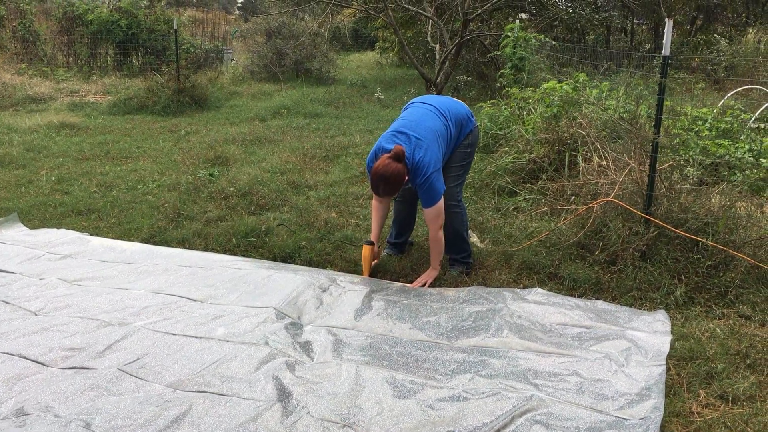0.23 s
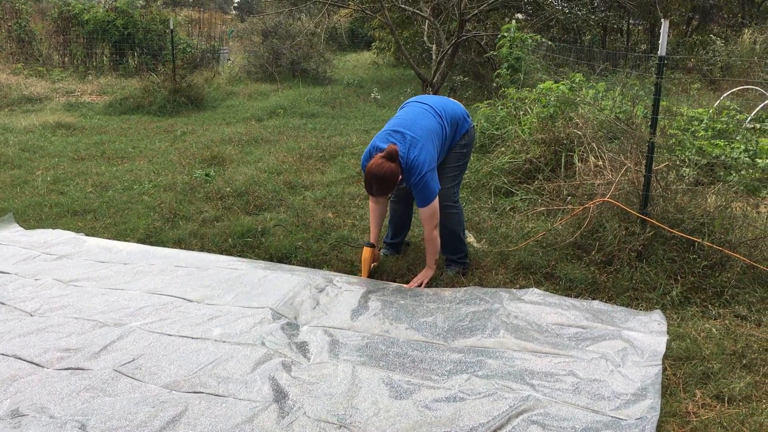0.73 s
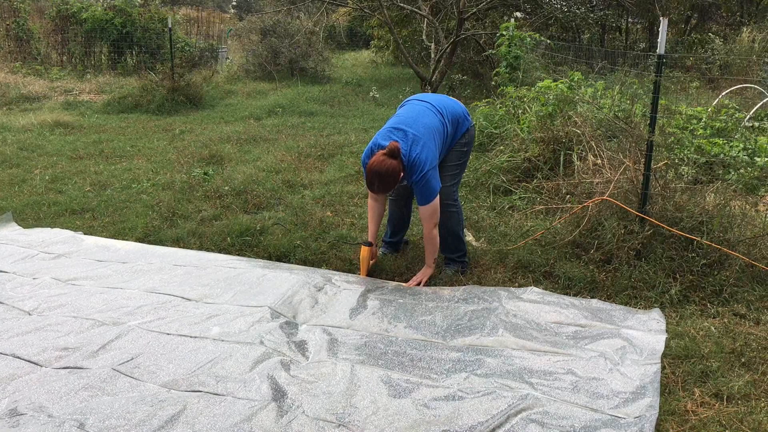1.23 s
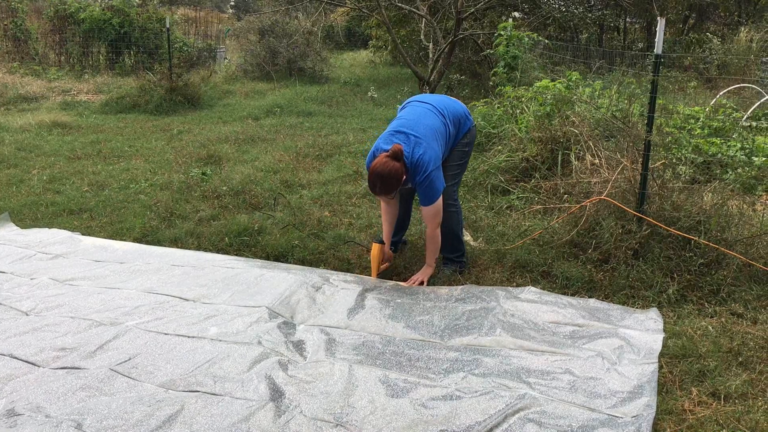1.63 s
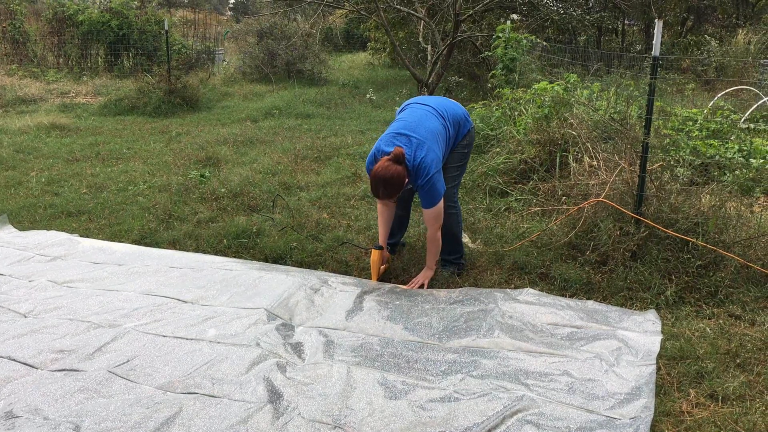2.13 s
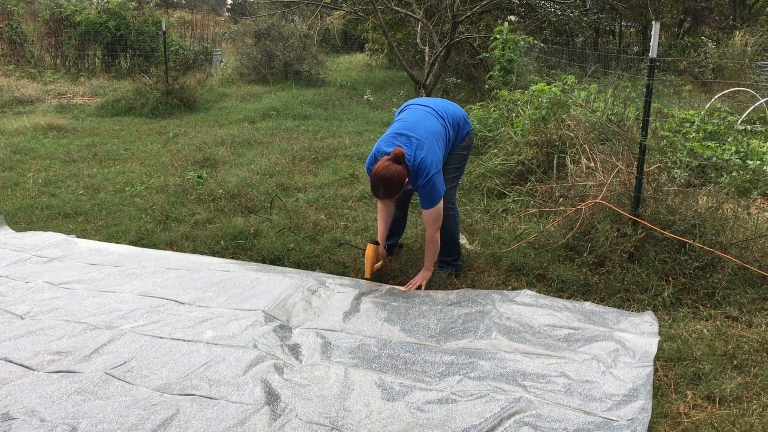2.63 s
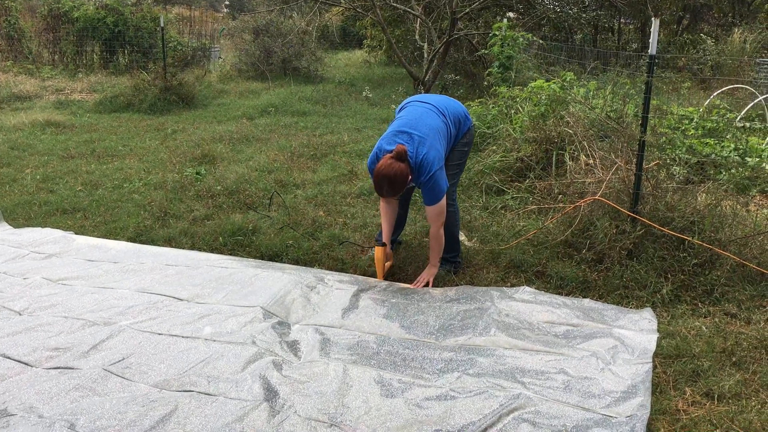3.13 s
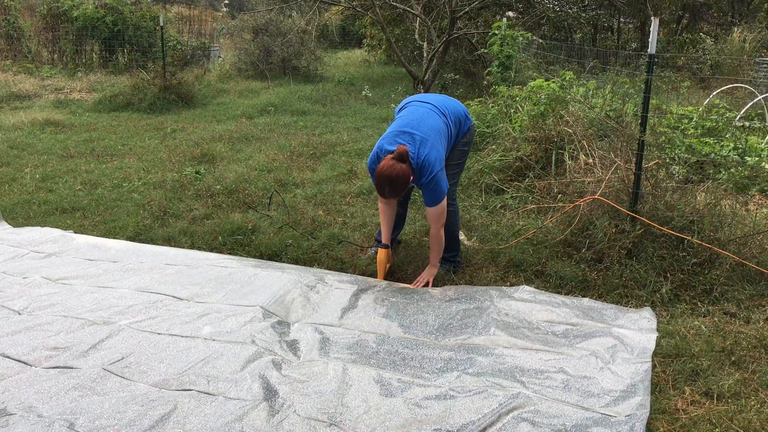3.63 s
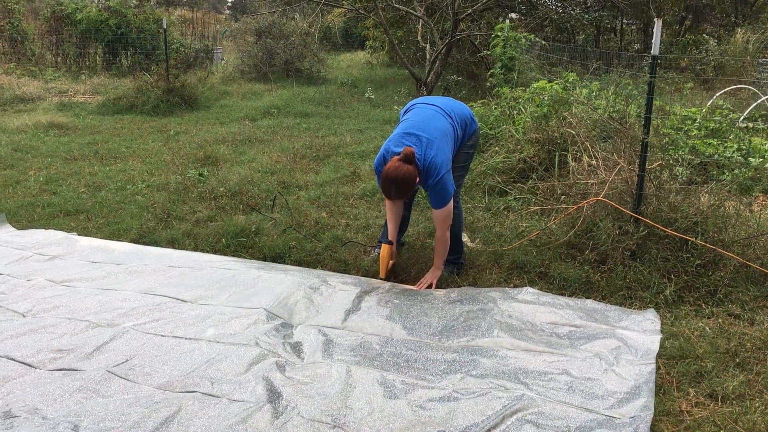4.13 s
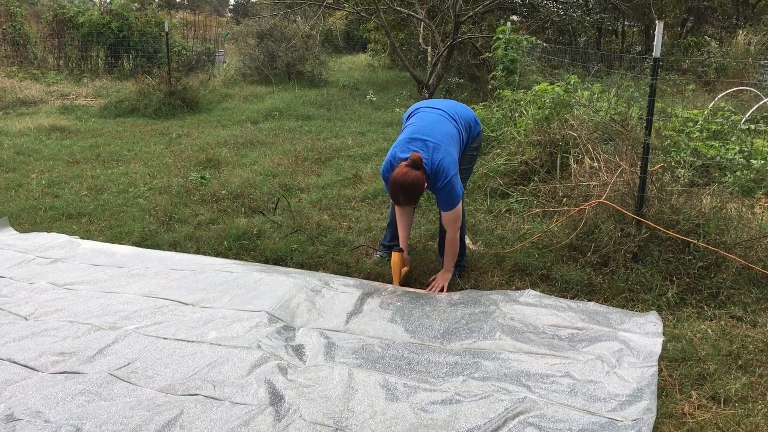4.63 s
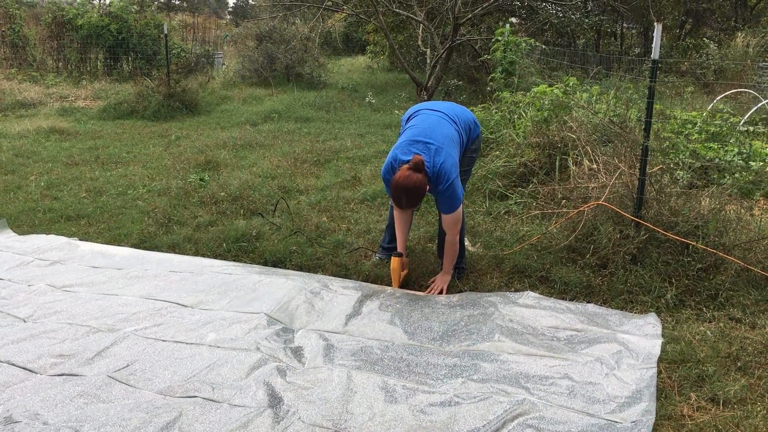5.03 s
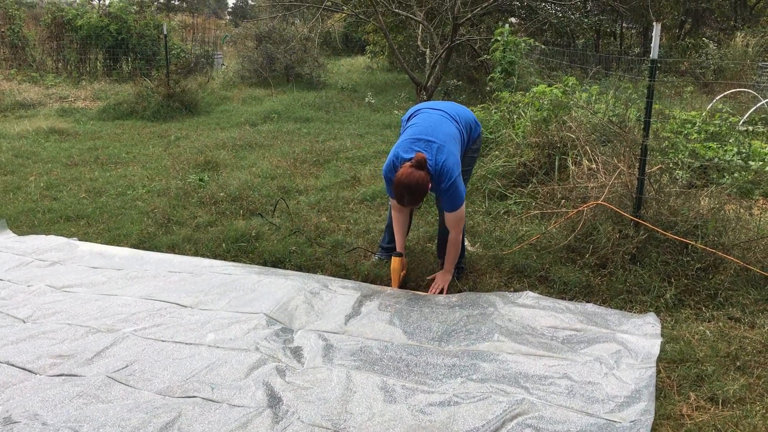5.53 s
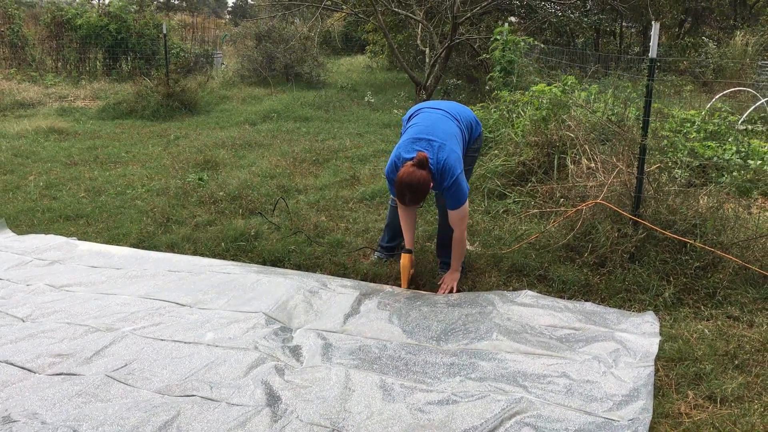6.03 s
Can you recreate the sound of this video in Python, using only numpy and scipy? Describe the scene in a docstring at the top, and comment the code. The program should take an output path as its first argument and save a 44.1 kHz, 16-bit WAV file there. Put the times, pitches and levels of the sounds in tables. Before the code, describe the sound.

Four sharp, spaced shots from an electric staple gun outdoors, with soft plastic ticks and a light breeze in the foliage.

```python
"""A lawn, one microphone a few metres from an electric staple gun tacking plastic sheet to a board.
In each of four shots the plunger slides, slams the staple into the wood and springs back on its stop.
There are no walls: grass and bushes return only a faint tail. Creases in the sheet tick under a hand,
foliage hisses all round, a far bird chirps and a light wind rumbles on the microphone."""
import sys
import numpy as np
from scipy import signal
from scipy.fft import rfft, irfft
from scipy.io import wavfile

SR = 44100
rng = np.random.default_rng(int(sys.argv[2]) if len(sys.argv) > 2 else 0)


def put_to_file(sound):
    """Save the sound as 16-bit audio at rate SR, in the file named by the first command-line argument."""
    columns = np.atleast_2d(sound).T  # one column per channel
    safe = np.clip(columns, -1, 1)
    whole_steps = np.round(safe * 32767)
    wavfile.write(sys.argv[1], SR, whole_steps.astype(np.int16))


N = 276948
AGE = np.arange(SR // 3) / SR   # seconds since a short sound began

# Far leaves in the breeze. Each row: frequency in Hz, relative level in dB.
LEAF_SPECTRUM = [(120, 3), (200, -3.5), (283, -3), (472, -5.5), (621, 0.5), (929, 2), (2450, -0.5),
                 (2940, -6.5), (3460, -2.5), (4900, -10), (5570, -9), (9130, -17), (10400, -16.5),
                 (15000, -23), (15800, -28)]
# Wind on the microphone. Each row: frequency in Hz, relative level in dB.
WIND_SPECTRUM = [(12, -40), (20, -21), (43, 0), (64, 2.5), (260, -24.5), (340, -76), (570, -120)]
# Its slow swell, about one gust a second. Each row: time in seconds, relative level in dB.
WIND_GUSTS = [(0, -51), (0.4, -46), (1.0, -48.0), (1.5, -53.5), (2.3, -46), (2.95, -52.0), (3.25, -45.5),
              (4.15, -49.0), (4.95, -46.5), (5.75, -51.5), (6.2, -47.5)]
# Soft bumps of air on the microphone. Each row: start in seconds, pitch in Hz, level in dB.
AIR_BUMPS = [(3.211, 61, -28), (4.36, 70, -35), (6.22, 58, -31)]
# A small far bird. Each row: start and length in seconds, first and last pitch in Hz, level in dB.
BIRD_CHIRPS = [(1.956, .022, 6350, 6960, -48), (3.344, 0.0067, 5840, 6360, -42),
               (5.292, .026, 6300, 7500, -49)]
# Ticks of the sheet under the hand. Each row: start in seconds, relative level in dB.
SHEET_TICKS = [(0.3845, -34), (1.3764, -28), (3.0142, -30.5), (3.705, -28), (4.2702, -27.5), (5.6356, -27),
               (5.9556, -26.5), (6.1996, -32), (6.2378, -28)]
# Crinkling plastic and dry grass. Each row: frequency in Hz, relative level in dB.
CRINKLE_SPECTRUM = [(300, -3.5), (1200, 3), (3000, 2.5), (6000, -6.5), (10000, -10.5), (15000, -23)]
# What grass and bushes return of a shot. Each row: frequency in Hz, relative level in dB.
SCATTER_SPECTRUM = [(200, -26), (1000, -5), (3500, 3), (8000, 1), (15000, -11)]
# The plunger's steel, sliding and snapping. Each row: frequency in Hz, relative level in dB.
PLUNGER_SPECTRUM = [(200, -3.5), (700, -6.5), (2000, 4.5), (5000, 0.5), (8500, 0), (15000, -9)]
# The dense ringing of housing and nose. Each row: frequency in Hz, relative level in dB.
CRACK_SPECTRUM = [(120, -17), (250, -1.5), (480, -20.5), (800, 2.5), (1400, -0.5), (2600, 2.5), (4200, 3),
                  (5300, 0), (8500, -4), (10300, -5.5), (12000, -9), (15500, -18)]
# How fast that ringing dies. Each row: frequency in Hz, time to fall 60 dB in seconds.
CRACK_DECAY = [(150, 0.098), (1000, 0.049), (3000, 0.026), (6000, 0.017), (14000, 0.032)]
# Modes of the gun pressed on the board.
# Each row: frequency in Hz, relative level in dB, time to fall 60 dB in seconds.
GUN_ON_BOARD_MODES = [(190.7, -30.5, 0.063), (347, -32.5, 0.045), (522, -31, 0.062), (759.5, -18.5, 0.045),
                      (874, -18, 0.048), (987, -22, 0.082), (1128, -21, 0.063), (1283, -22.5, 0.058),
                      (1500, -21.5, 0.04), (1610, -24, 0.073), (2230, -43, .035), (2550, -23, 0.017),
                      (3160, -26.5, 0.038), (3965, -13.5, 0.023), (4235, -14.5, 0.022), (5050, -34, .03),
                      (6270, -18.5, 0.021), (7560, -18.5, 0.015), (8350, -18.5, 0.019),
                      (11780, -24.5, 0.022)]
# The shots. Each row: strike time in seconds, gain in dB, delay in seconds and gain in dB of the
# staple seating, the same two for the plunger's return, board resonance in Hz, its gain in dB,
# then the gains of thud, low mids, upper mids and treble in dB.
STAPLE_SHOTS = [(1.0771, 0, 0.0036, -2.5, 0.014, -15.5, 867, -1.5, 4, 6, 0, 3.5),
                (2.3771, 0, .0031, -2.5, 0.019, -16.5, 1340, 6.5, 1, 0.5, 4, 0),
                (3.9102, 1, .0032, 0.5, .0178, -13, 2030, 5.5, -1, -1, 1.5, -1),
                (5.3272, -1.5, .0030, 1.5, 0.017, -13, 1520, 8, -3, -2.5, 1, 2.5)]


def from_db(db):
    """Decibels to gain."""
    return 10 ** (np.asarray(db) / 20)


def rms_one(x):
    """Scale to rms 1."""
    return x / np.sqrt(np.mean(x ** 2) + 1e-20)


def in_time(rows):
    """A control curve at every sample."""
    return np.interp(np.arange(N) / SR, *np.transpose(rows))


def at_hz(points, hz):
    """Read a table on a log-frequency axis."""
    freqs, values = np.transpose(points)
    return np.interp(np.log(hz), np.log(freqs), values)


def add(out, start_s, sound):
    """Mix a sound in from start_s on."""
    start = max(round(start_s * SR), 0)
    out[start:start + len(sound)] += sound[:len(out) - start]


def tint(x, spectrum):
    """Give a signal a colour, rms 1."""
    hz = np.maximum(np.fft.rfftfreq(len(x), 1 / SR), 1)
    return rms_one(irfft(rfft(x) * from_db(at_hz(spectrum, hz)), len(x)))


def noise(spectrum, size=len(AGE)):
    """Steady noise of a given colour, rms 1."""
    return tint(rng.standard_normal(size), spectrum)


def drift(per_s):
    """A slow random wander, rms 1."""
    knots = rng.standard_normal(N // 100)
    return rms_one(np.interp(np.arange(N) / SR * per_s, np.arange(len(knots)), knots))


def dying(t60):
    """Decay from 1, falling 60 dB in t60 seconds."""
    return np.exp(-np.log(1000) * AGE / max(t60, 1e-3))


def ring(hz, t60):
    """One struck mode of random polarity."""
    return rng.choice([-1, 1]) * np.sin(2 * np.pi * hz * AGE) * dying(t60)


def bell(x, hz, gain_db, q):
    """Boost or cut a band around hz."""
    gain = from_db(gain_db / 2)
    angle = 2 * np.pi * min(hz, SR / 2 - 1) / SR
    width = np.sin(angle) / (2 * q)
    forward = [1 + width * gain, -2 * np.cos(angle), 1 - width * gain]
    feedback = [1 + width / gain, -2 * np.cos(angle), 1 - width / gain]
    return signal.lfilter(forward, feedback, x)


def rustle(grains_per_s=420, clump_db=3, spread_db=6.5, grain_t60=0.0052):
    """Dry grass and loose plastic stir: a dense patter of grains, most too small to hear alone."""
    born = rng.random(N) < grains_per_s * from_db(clump_db * drift(per_s=14)) / SR
    sizes = from_db(spread_db * np.minimum(rng.exponential(1, N), 2.7))
    power = signal.fftconvolve(born * sizes ** 2, dying(grain_t60) ** 2)[:N]
    patter = rng.standard_normal(N) * np.sqrt(np.maximum(power, 0))
    return tint(patter, CRINKLE_SPECTRUM)


def foliage(far_db=-46.5, near_db=-51):
    """In a steady breeze far leaves hiss evenly and the grass near the microphone rustles."""
    return from_db(far_db) * noise(LEAF_SPECTRUM, N) + from_db(near_db) * rustle()


def wind(gain_db=-1.5, eddy_db=2.5, eddies_per_s=14):
    """Gusts swell on the microphone; their eddies make lumpy bass and now and then a bump."""
    level_db = in_time(WIND_GUSTS) + gain_db + eddy_db * drift(eddies_per_s)
    out = from_db(level_db) * noise(WIND_SPECTRUM, N)
    for start_s, hz, bump_db in AIR_BUMPS:
        add(out, start_s, from_db(bump_db) * ring(hz, t60=0.09))
    return out


def bird():
    """Thin, quick upward whistles from far off."""
    out = np.zeros(N)
    for start_s, length_s, first_hz, last_hz, level_db in BIRD_CHIRPS:
        hz = np.linspace(first_hz, last_hz, max(int(length_s * SR), 2))
        whistle = np.sin(2 * np.pi * np.cumsum(hz) / SR)
        add(out, start_s, from_db(level_db) * np.hanning(len(hz)) * whistle)
    return out


def sheet(gain_db=-7):
    """Creases in the plastic flip under the hand with short, soft ticks."""
    out = np.zeros(N)
    for start_s, level_db in SHEET_TICKS:
        add(out, start_s, from_db(level_db + gain_db) * noise(CRINKLE_SPECTRUM) * dying(t60=0.018))
    return out


def crack():
    """Crowded modes of housing and nose, in half-octave bands: highs die fast, lows swell and last."""
    edges = np.geomspace(110, 17000, 16)
    centres = np.sqrt(edges[1:] * edges[:-1])
    gains = from_db(at_hz(CRACK_SPECTRUM, centres)) * np.sqrt(np.diff(edges))
    out = 0
    for low, high, hz, gain in zip(edges, edges[1:], centres, gains / np.linalg.norm(gains)):
        bandpass = signal.butter(2, [low, high], "band", fs=SR, output="sos")
        band = signal.sosfilt(bandpass, rng.standard_normal(2 * len(AGE)))[len(AGE):]
        envelope = dying(at_hz(CRACK_DECAY, hz)) * (1 - np.exp(-AGE * hz))
        out = out + gain * rms_one(band * envelope) * np.sqrt(np.mean(envelope ** 2))
    return out


def soft_crack(edge_hz):
    """A softer contact: the crack loses its treble above edge_hz."""
    return signal.sosfilt(signal.butter(2, edge_hz, fs=SR, output="sos"), crack())


def shot(seat_s, seat_db, return_s, return_db, travel_s):
    """One cycle of the solenoid, from the moment the plunger starts sliding in its guide."""
    sliding = np.clip(AGE / 0.00033, 0, 1) * np.clip((travel_s - AGE) / 0.0002 + 1, 0, 1)
    out = from_db(-24.5) * noise(PLUNGER_SPECTRUM) * sliding
    # the driver shears a staple off the strip just before the blow
    add(out, travel_s - 0.0009, from_db(-14) * soft_crack(edge_hz=4500) * dying(t60=0.016))
    # the staple enters the wood: a crack, and gun and board ring
    body = sum(from_db(db + rng.normal(0, 1)) * ring(hz, t60) for hz, db, t60 in GUN_ON_BOARD_MODES)
    add(out, travel_s, from_db(-10.5) * crack() + from_db(-2) * body)
    # the plunger bottoms out, steel on steel: a very short, bright snap
    add(out, travel_s + 0.0006, from_db(-9) * noise(PLUNGER_SPECTRUM) * dying(t60=0.005))
    # the staple's crown seats in the wood, a duller blow
    add(out, travel_s + seat_s, from_db(seat_db - 9) * soft_crack(edge_hz=3900) * dying(t60=0.078))
    # the spring throws the plunger back on its stop, where it bounces once
    add(out, travel_s + return_s, from_db(return_db - 12) * soft_crack(edge_hz=13000))
    add(out, travel_s + return_s + 0.0028, from_db(return_db - 14) * soft_crack(edge_hz=3500))
    # grass and bushes send a thin scatter back to the microphone
    scatter = from_db(-40.5) * noise(SCATTER_SPECTRUM) * dying(t60=0.26)
    fade_in = np.clip((AGE - travel_s) / 0.01, 0, 1)
    return out + scatter * fade_in


def staple_gun(travel_s=0.0034):
    """The gun, a few metres off: each new spot on the board and each tilt colours the shot."""
    out = np.zeros(N)
    for strike_s, gain_db, *action, board_hz, board_db, thud_db, low_db, mid_db, top_db in STAPLE_SHOTS:
        sound = bell(shot(*action, travel_s), board_hz, board_db, q=4)
        for hz, colour_db in (260, thud_db), (950, low_db), (3200, mid_db), (8500, top_db):
            sound = bell(sound, hz, colour_db, q=1)
        add(out, strike_s - travel_s, from_db(gain_db) * sound)
    return out


def scene():
    """Gun, sheet and garden as they reach the one microphone."""
    return (staple_gun() + sheet() + bird() + foliage() + wind())[None]


def record(dry, low_cut_hz=27, high_cut_hz=16000, ceiling=1.3):
    """The microphone sheds deep bass and has a narrow treble dip; peaks are rounded, the top is cut."""
    lean = signal.sosfilt(signal.butter(4, low_cut_hz, "high", fs=SR, output="sos"), dry)
    coloured = bell(lean, hz=10420, gain_db=-10, q=24)
    rounded = ceiling * np.tanh(coloured / ceiling)
    return signal.sosfilt(signal.ellip(10, 0.1, 80, high_cut_hz, fs=SR, output="sos"), rounded)


dry = scene()
out = record(dry)
put_to_file(out)
```